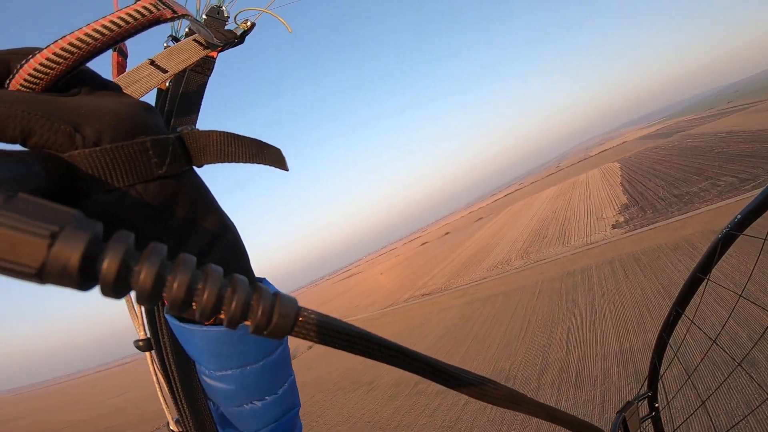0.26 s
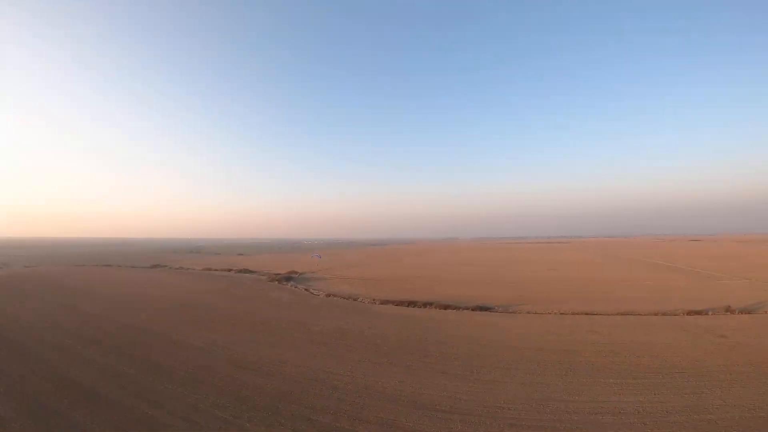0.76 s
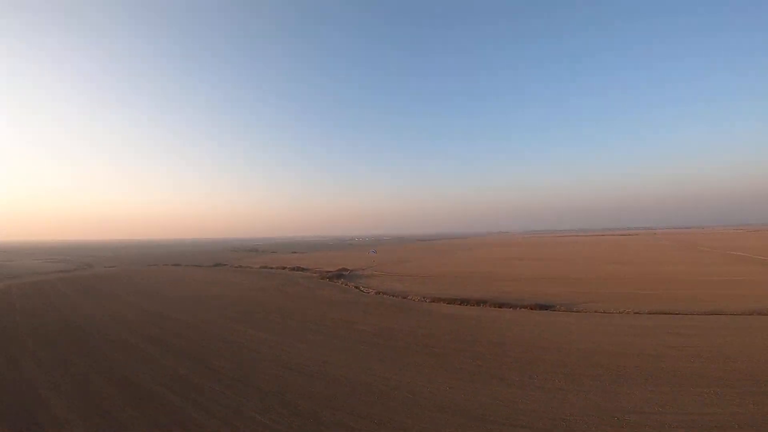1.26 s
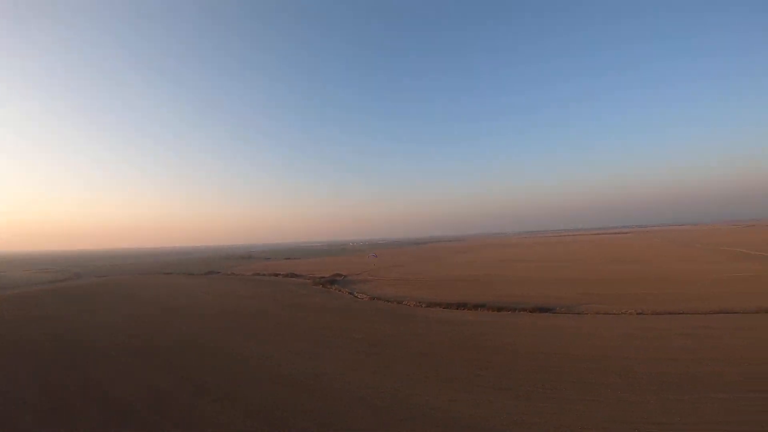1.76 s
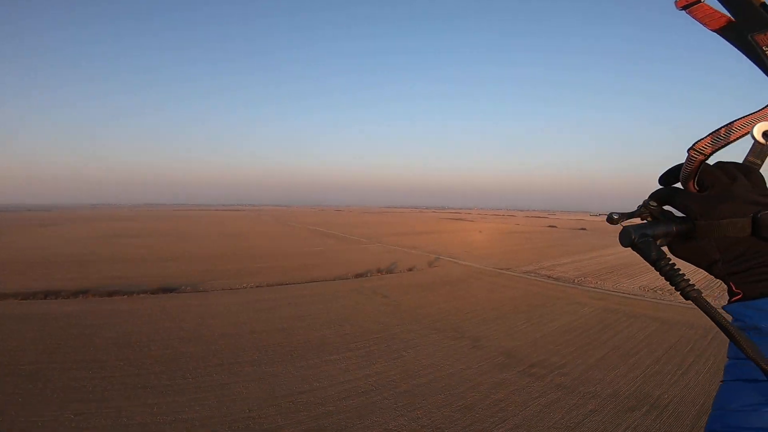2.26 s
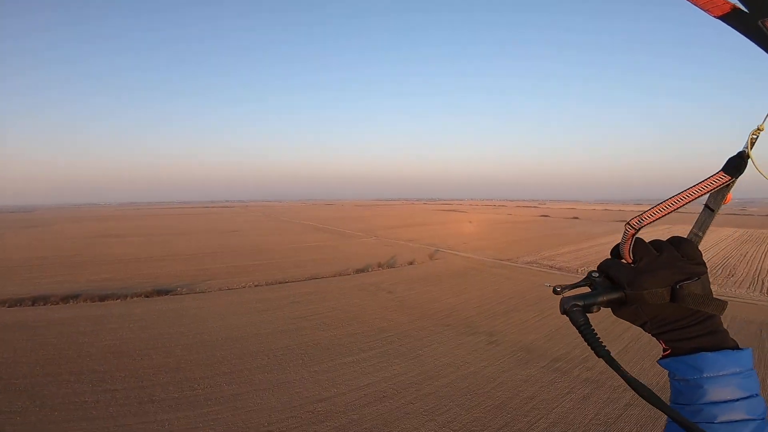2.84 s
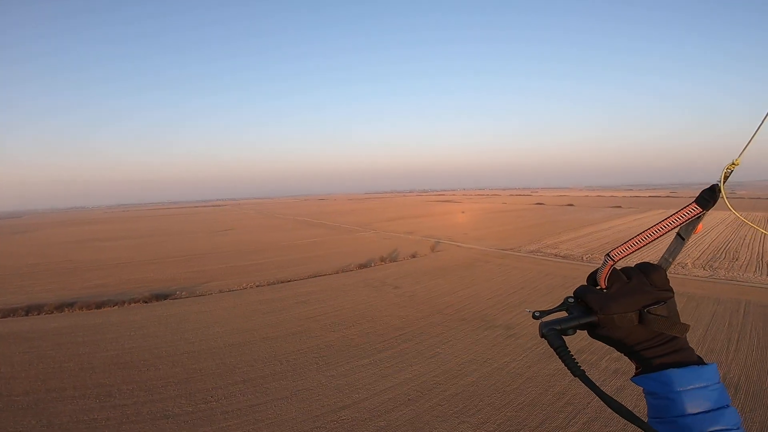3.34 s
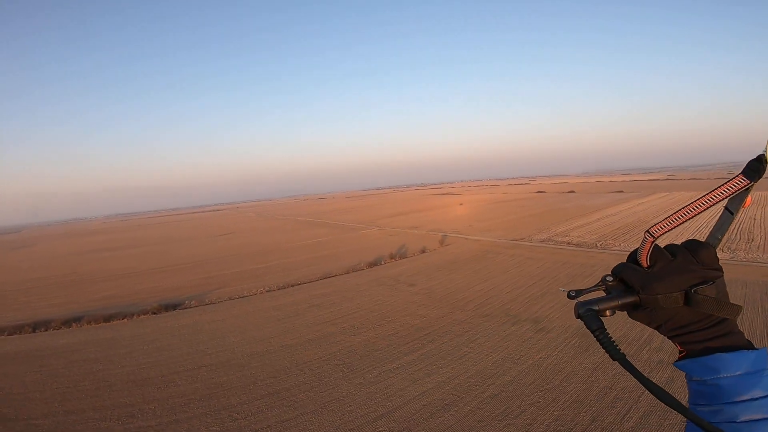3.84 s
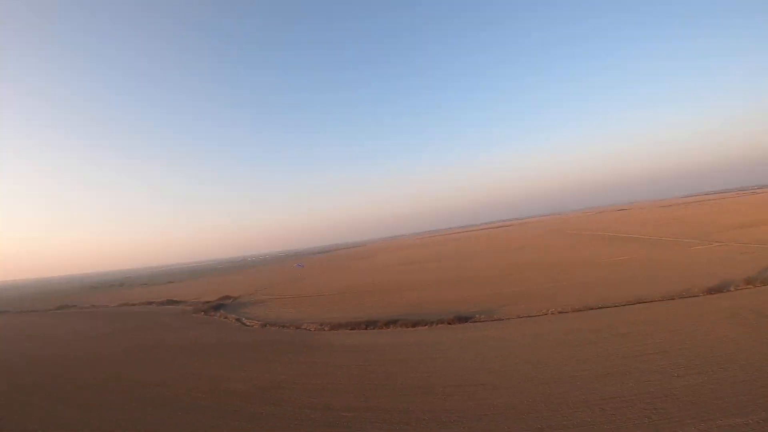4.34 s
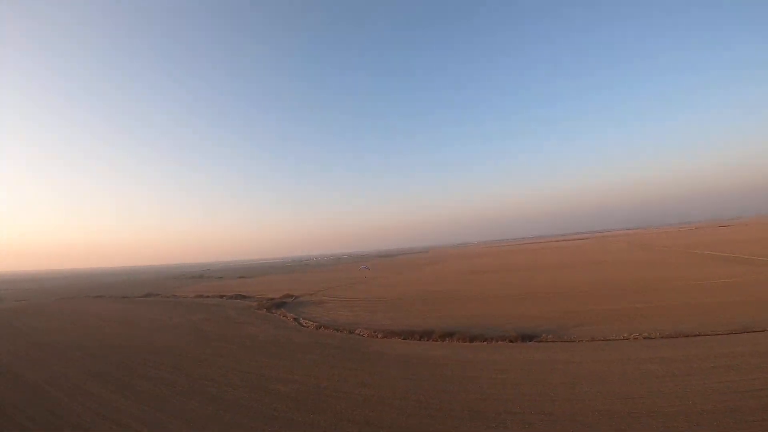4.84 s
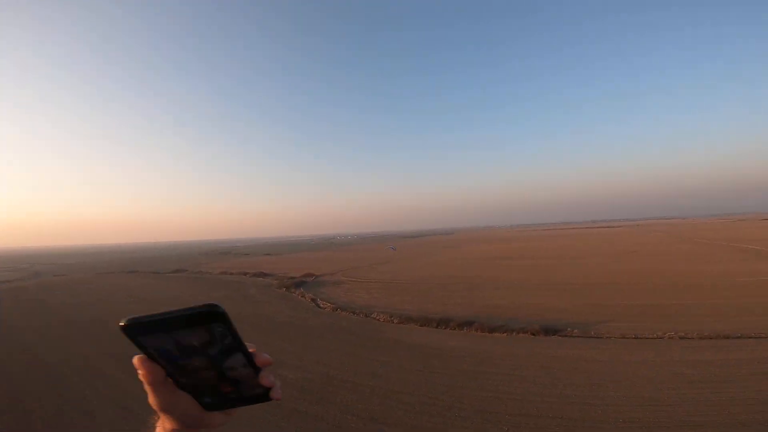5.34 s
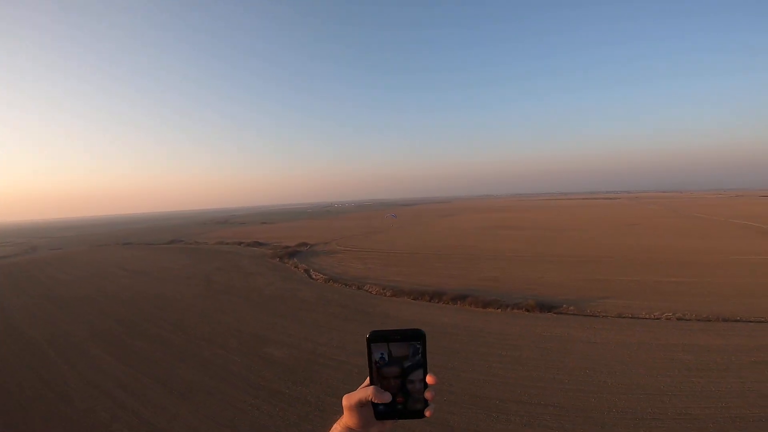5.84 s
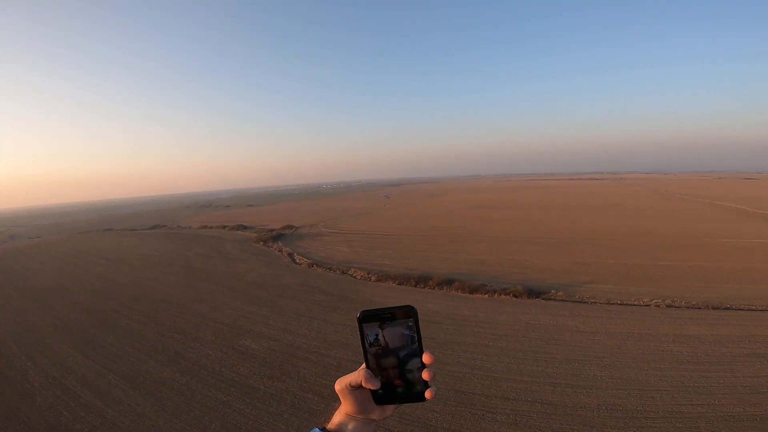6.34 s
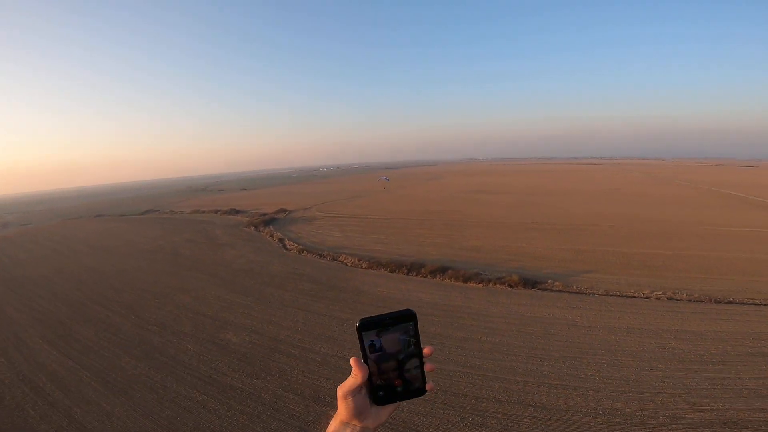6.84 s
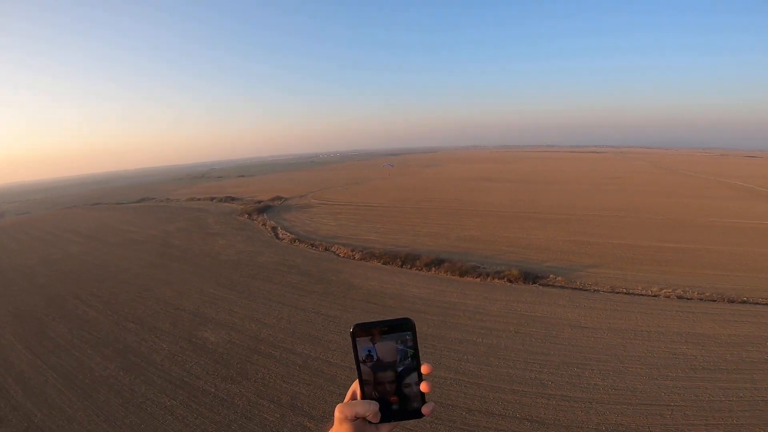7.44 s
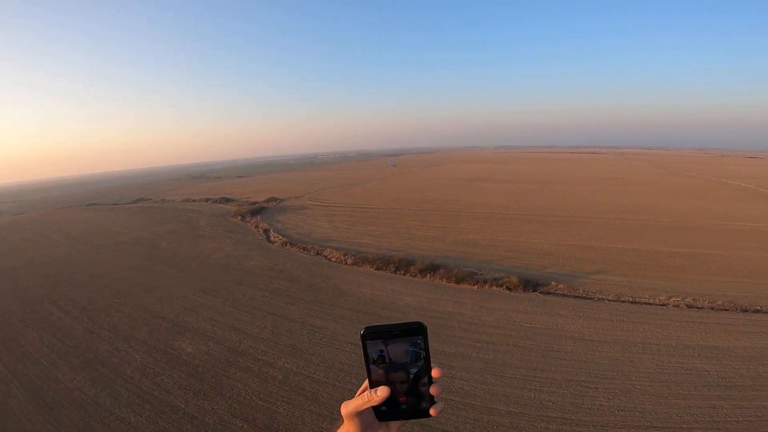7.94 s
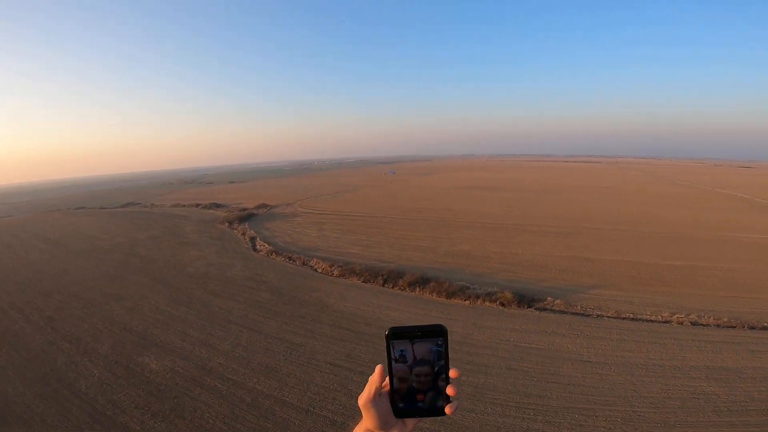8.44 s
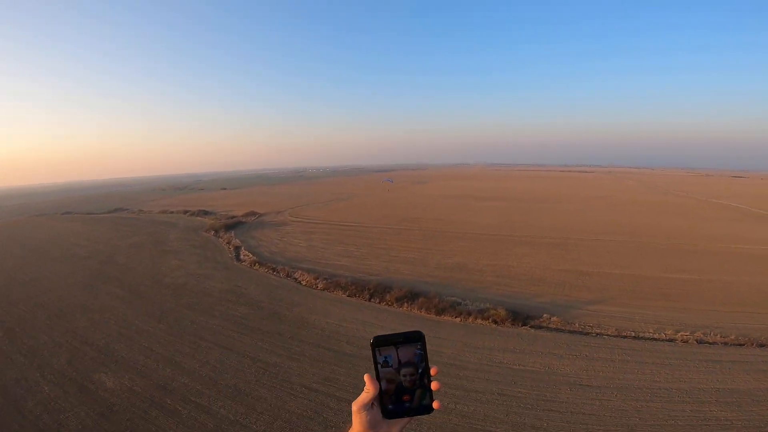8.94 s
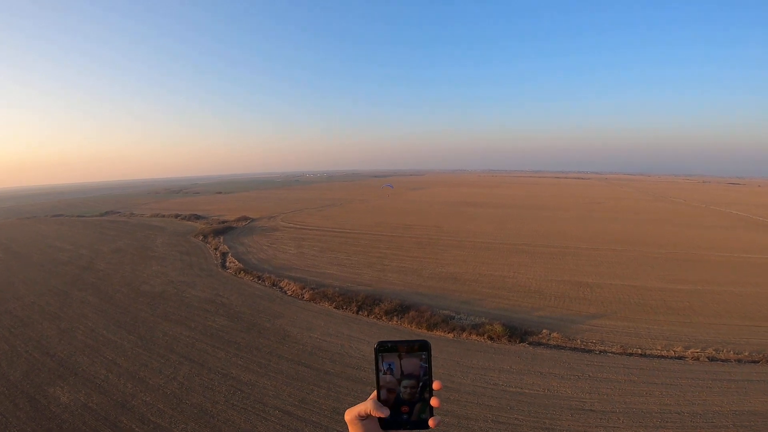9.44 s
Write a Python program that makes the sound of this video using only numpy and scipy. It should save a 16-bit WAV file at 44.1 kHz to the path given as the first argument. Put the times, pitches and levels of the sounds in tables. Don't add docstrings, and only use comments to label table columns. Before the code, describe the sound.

A paramotor's small two-stroke and propeller drone densely behind the helmet microphone, thumping and buzzing through gusty air, rising slightly then gradually slowing.

```python
import sys
import numpy as np
from scipy import signal
from scipy.fft import rfft, irfft, next_fast_len
from scipy.io import wavfile
from scipy.ndimage import uniform_filter1d, map_coordinates

SR = 44100
rng = np.random.default_rng(int(sys.argv[2]) if len(sys.argv) > 2 else 0)


def decibels_to_gain(level_db):
    exponent = np.asarray(level_db, float) / 20
    return 10 ** exponent


def to_wav(s):
    ch = np.atleast_2d(s).T
    pcm = np.round(np.clip(ch, -1, 1) * 32767)
    wavfile.write(sys.argv[1], SR, pcm.astype(np.int16))


N = 426888


def unit(x):
    return x / np.sqrt(np.mean(x ** 2) + 1e-20)


def curves(rows):
    seconds, *columns = np.transpose(rows)
    return [np.interp(np.arange(N) / SR, seconds, column) for column in columns]


def wobble(rate):
    knots = rng.standard_normal(int(N * rate / SR) + 4)
    return map_coordinates(knots, [np.arange(N) * rate / SR], order=1)


def noise(spectrum, patchy_db):
    z = signal.stft(rng.standard_normal(N), nperseg=512)[2]
    patches = uniform_filter1d(rng.standard_normal(z.shape), size=6, axis=0)
    patches = uniform_filter1d(patches, size=8, axis=1)
    white = signal.istft(z * decibels_to_gain(patchy_db * unit(patches)), nperseg=512)[1][:N]
    m = next_fast_len(N)
    hz, db = np.transpose(spectrum)
    log_hz = np.log(np.fft.rfftfreq(m, 1 / SR) + 1)
    gain = decibels_to_gain(np.interp(log_hz, np.log(hz + 1), db, -120, -120))
    return unit(irfft(rfft(white, m) * gain, m)[:N])


def burst(turns, at, sharp):
    return np.exp(sharp * (np.cos(2 * np.pi * (turns - at)) - 1))


def facing_value(facing, values):
    return np.interp(facing, range(4), values)


def at_events(times, shape):
    clock = np.arange(0, N + 200, 200) / SR
    since = clock - np.asarray(times)[:, None]
    return lambda sizes: np.interp(np.arange(N) / SR, clock, np.asarray(sizes) @ shape(since))


# time of the peak in seconds, peak in dB, share in the deep rumble 0-1.
GUSTS = [(0, -14, 0.97), (.81, -25, 0.43), (1.02, -24.5, 0.46), (1.25, -28.5, 0.67), (1.56, -22.5, 0.11),
         (1.7, -27, .9), (1.78, -29, 0.1), (1.99, -27.5, .2), (4.6, -17.5, .3), (4.72, -20.5, 0.24),
         (4.82, -21, 0.07), (5.03, -30, .4), (5.1, -20, 0.22), (5.34, -23, 0.15), (5.53, -19, 0.14),
         (5.66, -22.5, .3), (5.98, -29, 0.9), (6.2, -24, 0.93), (6.63, -25, .9), (6.87, -24, 0.49),
         (7.41, -19.5, 0.6), (7.82, -21, 0.81), (8.14, -24, .95), (8.22, -28, 0.2), (8.36, -21.5, 0.67),
         (8.56, -25, .95), (8.98, -22, .3), (9.17, -20, .3), (9.38, -19, 0.48), (9.54, -24, 0.11)]
# start in seconds, peak in dB, pitch in Hz.
GUST_THUMPS = [
    (1.5, -23.5, 95),
    (1.879, -15.5, 101.3),
    (2.13, -17, 137),
    (4.6, -21.5, 95),
    (4.789, -26, 85.5),
    (5.03, -16.5, 124.6),
    (5.641, -18.5, 100),
]
# pitch in Hz, density in dB.
RUMBLE = [(7, -22), (15, -1.5), (25, 1), (40, 0.5), (60, -14.5), (90, -45)]
THUD = [(40, -34), (65, 2.5), (90, 0), (140, -5), (220, -15.5), (400, -29)]
RUMBLE_DB = [-55, -35, -43.5, -34]
THUD_DB = [-41.5, -24, -35, -32]
GUST_RISE_DB_PER_S, GUST_FALL_DB_PER_S = 169.5, 190


def gusts(facing):
    seconds, peak_db, deep = np.transpose(GUSTS)
    deep = np.clip(deep, 0, 1)
    blow = at_events(seconds, lambda u: decibels_to_gain(np.where(u < 0, GUST_RISE_DB_PER_S, -GUST_FALL_DB_PER_S) * u))
    rumble_gain = decibels_to_gain(facing_value(facing, RUMBLE_DB)) + blow(decibels_to_gain(peak_db) * deep)
    thud_gain = decibels_to_gain(facing_value(facing, THUD_DB)) + blow(decibels_to_gain(peak_db) * (1 - deep))
    rumble = unit(decibels_to_gain(2.8 * wobble(9)) * noise(RUMBLE, patchy_db=.8))
    thud = unit(decibels_to_gain(1.8 * wobble(16)) * noise(THUD, patchy_db=.8))
    out = rumble_gain * rumble + thud_gain * thud
    t = np.arange(N) / SR
    for start, db, hz in GUST_THUMPS:
        swell = np.exp(-((t - start - .02) / .02) ** 2)
        out += decibels_to_gain(db) * swell * np.sin(2 * np.pi * hz * (t - start))
    return out


# pitch in Hz, density in dB.
HISS = [(4500, -21), (5500, -2.5), (6500, -5.5), (7700, -3), (8600, -7), (9300, -12), (9700, -10.5),
        (10400, -20), (11000, -20.5), (12000, -26.5), (13500, -34), (15500, -45.5)]
CLATTER = [(3300, -38.5), (4000, -2), (4200, 2.5), (4400, 0.5), (5200, -16), (6000, -27), (7000, -49)]
FINS_DB = [-26.5, -25.5, -24.5, -20.5]
FINS_KNEE_HZ, FINS_DB_PER_HZ = 54.26, 5.5


def cylinder_fins(hz, crank, facing, swell):
    firing = burst(crank, at=.1, sharp=6)
    hiss = unit((.7 + .35 * swell + .65 * firing) * noise(HISS, patchy_db=.7))
    clatter = unit((.5 + firing) * noise(CLATTER, patchy_db=.7))
    clatter_db = facing_value(facing, FINS_DB) + FINS_DB_PER_HZ * np.minimum(hz - FINS_KNEE_HZ, 0)
    return hiss, decibels_to_gain(clatter_db) * clatter


SLAP_AT = [.95, .79, .9, .85]
SLAP_SHARP = [5.5, 3, 1.5, 1.5]
SLAP_DEPTH = [2.3, 1.7, 2.4, .65]


def blade_swell(blade, facing):
    depth = facing_value(facing, SLAP_DEPTH)
    slap = burst(blade, at=facing_value(facing, SLAP_AT), sharp=facing_value(facing, SLAP_SHARP))
    return (1 + depth * decibels_to_gain(.45 * wobble(60)) * slap) / (1 + .3 * depth)


# time in seconds, propeller wash in dB, view of the cylinder fins in dB.
WASH = [(0.0, -30.5, -61), (0.65, -31, -62), (0.81, -35.5, -60), (1.2, -31.5, -57.5), (1.86, -30.5, -56),
        (2.12, -29, -57), (2.25, -30, -61), (2.64, -27.5, -56), (3.99, -28, -54.5), (4.3, -28, -55),
        (4.53, -28.5, -51), (4.75, -29, -54), (5.05, -29.5, -55), (5.42, -32.5, -59.5),
        (5.88, -29.5, -60.5), (6.55, -28.5, -57.5), (7.2, -29.5, -59), (9.68, -28, -59.5)]
# time in seconds, low swell in dB, middle swell in dB.
EDDIES = [(.65, -7.5, 0), (.81, 9, 1.67), (1.21, -2, -1), (1.7, 8, 1.5), (1.91, 8, 8.5), (1.99, 10, -1.54),
          (2.23, 0, 8), (4.23, -7.5, -4.03), (4.39, 9, 1), (4.53, 6.5, 7), (5.01, -2.07, 1),
          (5.55, -5, 4.3), (5.88, 1.5, -2.08), (7.23, 5, 1), (9.08, -3, -0.5), (9.65, 4, 1)]
# pitch in Hz, density in dB.
THROB = [(80, -25), (130, -5.5), (200, -0.5), (300, -1), (400, -13), (600, -37.5)]
BODY = [(200, -35), (330, 2), (450, -1.5), (700, 2), (900, -4), (1300, -15.5), (2000, -43)]
EDGE_SIDE = [(600, -22.5), (900, 1), (1300, -0.5), (2000, -6), (2600, -8.5), (3000, -12), (3500, -14.5),
             (4300, -22.5), (5000, -24.5), (5600, -35.5), (6500, -52.5)]
EDGE_DOWN = [(600, -24.5), (900, 0.5), (1300, 0), (1700, -1.5), (2300, -8.5), (2780, -10), (2950, -5.5),
             (3140, -10.5), (4000, -18), (4300, -21), (4600, -23.5), (5000, -25.5), (5600, -38),
             (6500, -55)]
THROB_DB = [-2.5, 2, -5.5, -0.7]
BODY_DB = [-3, -2.05, -2.5, -2.5]
EDDY_S, EDGE_FOLLOWS = 0.066, 0.342


def wash(hz, blade, crank, facing):
    wash_db, hiss_db = curves(WASH)
    seconds, low_db, middle_db = np.transpose(EDDIES)
    eddy = at_events(seconds, lambda u: np.exp(-(u / EDDY_S) ** 2))
    throb_db = wash_db + facing_value(facing, THROB_DB) + eddy(low_db)
    body_db = wash_db + facing_value(facing, BODY_DB) + eddy(middle_db) + 3
    edge_db = wash_db + EDGE_FOLLOWS * eddy(middle_db)

    swell = blade_swell(blade, facing)
    throb = noise(THROB, patchy_db=.8)
    body = unit(swell ** facing_value(facing, [1.1, .7, .6, .7]) * noise(BODY, patchy_db=.7))
    side = np.clip(1 - np.abs(facing - 1.6) / 1.4, 0, 1)
    colour = np.sqrt(side) * noise(EDGE_SIDE, patchy_db=0.41)
    colour += np.sqrt(1 - side) * noise(EDGE_DOWN, patchy_db=0.58)
    edge = unit(swell ** 0.72 * decibels_to_gain(1.06 * wobble(150)) * colour)
    hiss, clatter = cylinder_fins(hz, crank, facing, swell)
    out = decibels_to_gain(throb_db) * throb + decibels_to_gain(body_db) * body
    return out + decibels_to_gain(edge_db) * (edge + clatter) + decibels_to_gain(hiss_db) * hiss


# time in seconds, blade thump
# in dB, lift of the helmet hollow in dB, lift of the chest echo in dB.
THUMP_AND_LIFTS = [(0.0, -13, -4.5, 0.22), (0.57, -13, 1, -1), (0.86, -18.5, -4, -3.5),
                   (0.97, -20.5, 0.3, 1.28), (1.05, -17.5, -3.5, -2.5), (1.89, -15, 8, 0), (1.97, -13.5, 5, -6),
                   (2.08, -17, 6.5, 1.5), (2.34, -14.5, 4.5, 2), (3.45, -13, 0.5, -0.24),
                   (4.02, -12.5, -3, 0.42), (4.82, -13.5, 11.5, -1.5), (5.3, -13, 7, -4.5),
                   (5.69, -16.5, 1.5, -3), (6.33, -13.5, 1.5, -1.5), (7.3, -15, -1.64, 1.08),
                   (8.79, -15, 4, -0.23), (9.68, -16.5, 7.5, -1.5)]


def thump_and_lifts():
    thump_db, *lifts = curves(THUMP_AND_LIFTS)
    return thump_db, lifts


HOLLOW_HZ, HOLLOW_WIDTH_HZ = 685.2, 91.7
CHEST_HZ, CHEST_WIDTH_HZ = 260, 160


def tone(hz, turns, levels_db, facing, lifts, flutter_db):
    hollow_db, chest_db = lifts
    hollow = hollow_db / (1 + ((hz - HOLLOW_HZ) / HOLLOW_WIDTH_HZ) ** 2)
    chest = chest_db / (1 + ((hz - CHEST_HZ) / CHEST_WIDTH_HZ) ** 4)
    db = facing_value(facing, levels_db) + hollow + chest + flutter_db * wobble(12)
    return np.sqrt(2) * decibels_to_gain(db) * np.cos(2 * np.pi * turns)


# firing order, then rms in dB facing left, ahead, right, down.
ENGINE = [(1, -44.5, -33.5, -36, -39), (2, -47, -34.5, -40, -30), (3, -47, -30.5, -38.5, -28),
          (4, -49, -43.5, -34.5, -38.5), (5, -55, -55, -44, -58), (6, -42, -43, -36.5, -46),
          (7, -46.5, -52.5, -38.5, -45), (8, -46, -55, -37.5, -48.5), (10, -52, -39, -45, -45),
          (11, -50, -51.5, -46.5, -45), (12, -51.5, -50, -46.5, -41.5)]
# blade order, firing order, then rms in dB
CHOP = [(2, -1, -43.5, -50, -38.5, -43), (1, 1, -30, -32, -26, -34.5), (2, 1, -42.5, -34, -31, -45),
        (3, 1, -49.5, -51.5, -49.5, -47.5), (1, 2, -51.5, -55, -51.5, -44), (1, 3, -45, -32.5, -36.5, -44),
        (1, 4, -56.5, -55.5, -55.5, -40)]
PIPE_HZ, PIPE_WIDTH_HZ, PIPE_LIFT_DB = 701, 40, 8.5


def exhaust(hz, ratio, blade, crank, facing):
    _, lifts = thump_and_lifts()
    firing = crank + .004 * wobble(30)
    out = np.zeros(N)
    for k, *db in ENGINE:
        order_hz = round(k) * ratio * hz
        pipe = decibels_to_gain(PIPE_LIFT_DB / (1 + ((order_hz - PIPE_HZ) / PIPE_WIDTH_HZ) ** 2))
        turns = round(k) * firing + .03 * k * k
        out += pipe * tone(order_hz, turns, db, facing, lifts, flutter_db=1.2)
    for b, e, *db in CHOP:
        turns = round(b) * blade + round(e) * firing + 0.293
        out += tone((round(b) + round(e) * ratio) * hz, turns, db, facing, lifts, flutter_db=1.0)
    return out


# order, then rms in dB facing left, ahead, right, down.
BLADE = [(2, -19, -32.5, -31, -44), (3, -32, -25.5, -32.5, -29), (4, -32.5, -33.5, -31.5, -28.5),
         (5, -36.5, -34.5, -32.5, -26), (6, -41.5, -35, -34.5, -32), (6.96, -39.5, -36.5, -35.5, -48),
         (7.9, -41.5, -42, -41.5, -48), (9, -42.5, -45, -41, -40), (10.03, -43, -43, -34, -39),
         (10.51, -51, -45.5, -34.5, -47), (12.187, -50, -52.5, -36.5, -35.5),
         (13.09, -44, -47.5, -37.5, -39), (13.99, -49, -41, -59.5, -50.5), (14.873, -44, -48, -56, -47),
         (16.03, -51, -50.5, -52.5, -55), (17.026, -48, -47, -40, -58.5), (18.117, -49.5, -52, -58.5, -43),
         (18.92, -50.5, -46.5, -44, -52.5), (20.05, -49.5, -57, -39.5, -53.5), (20.8, -48, -56, -47.5, -50),
         (21.89, -64, -57.5, -43.5, -55.5)]
STACK_AT = [1.14, .8, 1.13, .78]
STACK_SIGN = [0, .5, 0, .5]


def propeller(hz, blade, facing):
    thump_db, lifts = thump_and_lifts()
    out = np.sqrt(2) * decibels_to_gain(thump_db + 0.41 * wobble(14)) * np.cos(2 * np.pi * (blade - .25))
    out += tone(2 * hz, 2 * (blade - .2), BLADE[0][1:], facing, lifts, flutter_db=1.5)
    late = .0028 * wobble(30)
    stack = blade - facing_value(facing, STACK_AT) + late
    slap = blade - facing_value(facing, SLAP_AT) + late
    sign = facing_value(facing, STACK_SIGN)
    for k, *db in BLADE[1:5]:
        out += tone(round(k) * hz, round(k) * stack + sign, db, facing, lifts, flutter_db=.9)
    smear = facing_value(facing, [.003, .02, .035, .012])
    for k, *db in BLADE[5:]:
        turns = round(k) * slap + smear * (k - 9) ** 2
        out -= tone(round(k) * hz, turns, db, facing, lifts, flutter_db=1.3)
    return out


# time in seconds, blade passes in Hz.
BLADE_RATE = [(0, 59.22), (0.5, 59.38), (0.75, 59.15), (1.0, 59.58), (1.75, 59.35), (2.5, 59.72),
              (2.75, 60.14), (3.5, 62.95), (3.8, 63.4), (4.0, 63.27), (4.25, 62.85), (4.6, 62.55),
              (5.0, 61.5), (5.5, 59.0), (6.0, 57.88), (7.25, 55.22), (7.8, 54.65), (9.2, 51.26)]
# time in seconds, firings per blade pass.
BELT = [
    (0, 1.2227),
    (5, 1.2229),
    (6.5, 1.2205),
    (8.6, 1.2185),
    (9.68, 1.2178),
]
# time in seconds, facing (0 left, 1 ahead, 2 right, 3 down).
HEAD = [(0, -0.5), (.62, 0), (.9, 0.7), (2.0, 1.47), (2.4, 2), (4.3, 2), (4.6, 1.47), (5.17, 1.9),
        (5.32, 2.55), (5.9, 3), (9.68, 4)]


def scene():
    hz, = curves(BLADE_RATE)
    ratio, = curves(BELT)
    facing, = curves(HEAD)
    blade = np.cumsum(hz) / SR + .45
    crank = np.cumsum(hz * ratio) / SR
    air = gusts(facing) + wash(hz, blade, crank, facing)
    motor = exhaust(hz, ratio, blade, crank, facing) + propeller(hz, blade, facing)
    return (air + motor)[None]


def band_limit(x):
    return signal.sosfilt(signal.butter(12, 15050, fs=SR, output="sos"), x)


def record(dry):
    mix = dry / (1 + np.abs(dry / .85) ** 6) ** (1 / 6)
    return band_limit(mix)


dry = scene()
out = record(dry)
to_wav(out)
```